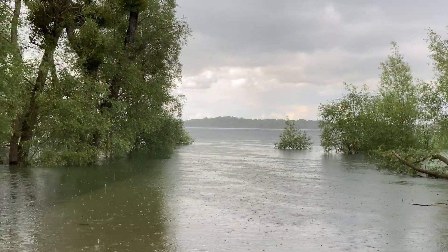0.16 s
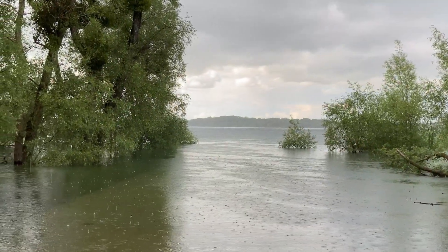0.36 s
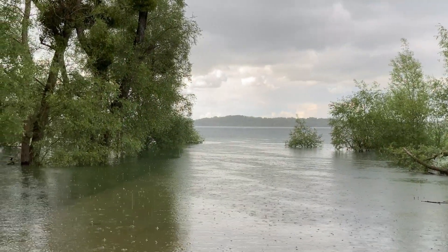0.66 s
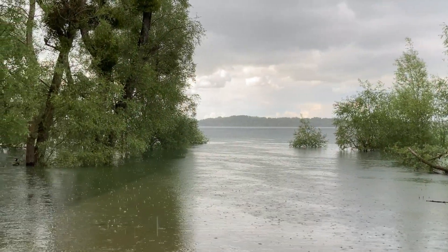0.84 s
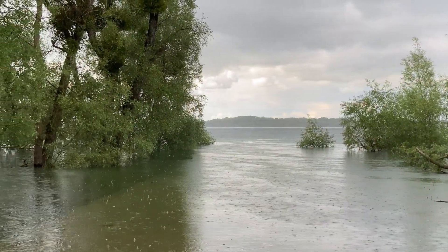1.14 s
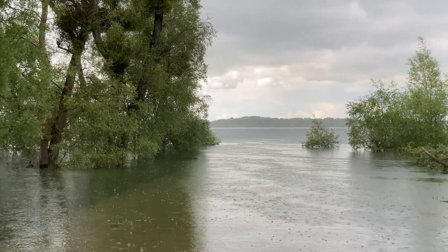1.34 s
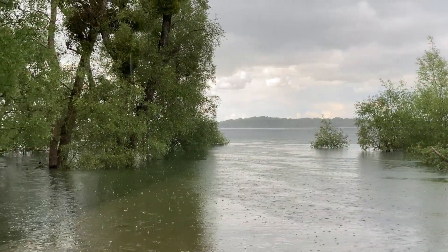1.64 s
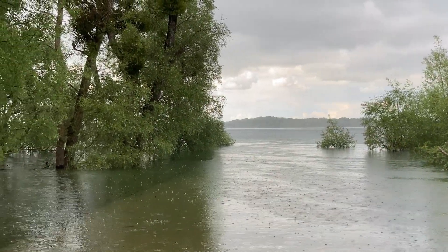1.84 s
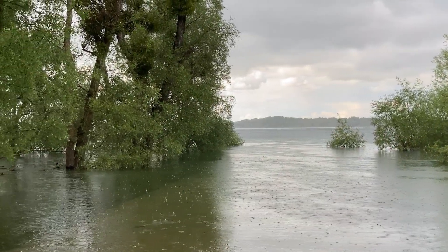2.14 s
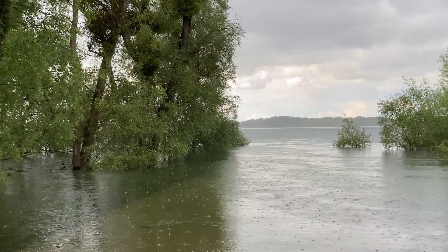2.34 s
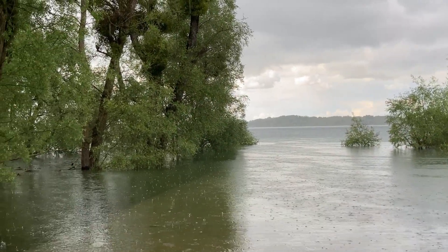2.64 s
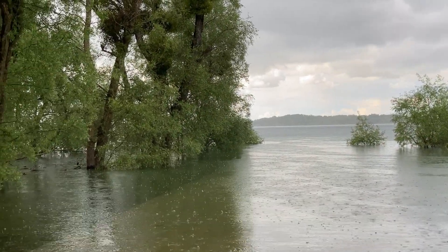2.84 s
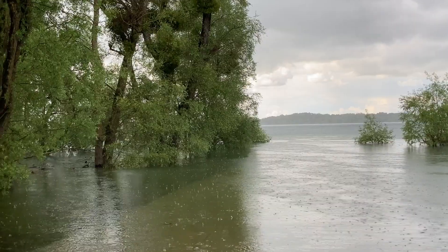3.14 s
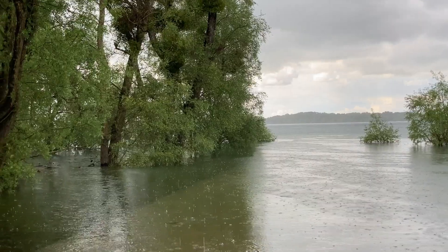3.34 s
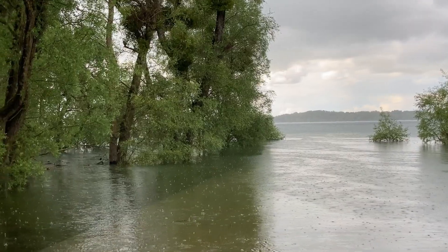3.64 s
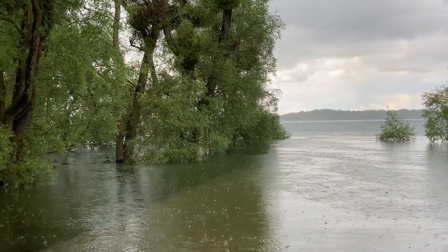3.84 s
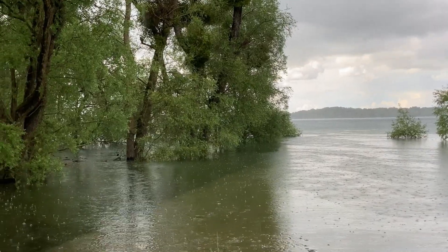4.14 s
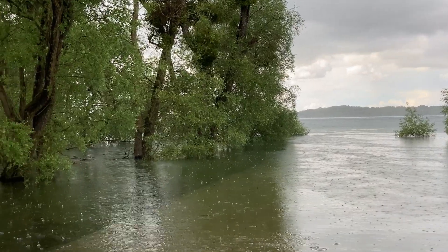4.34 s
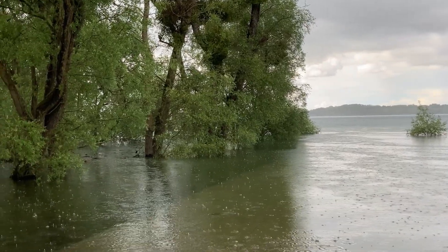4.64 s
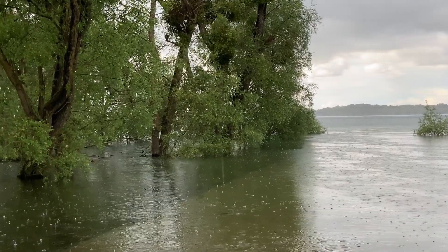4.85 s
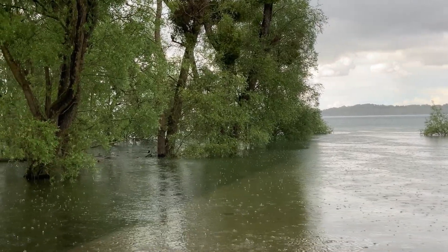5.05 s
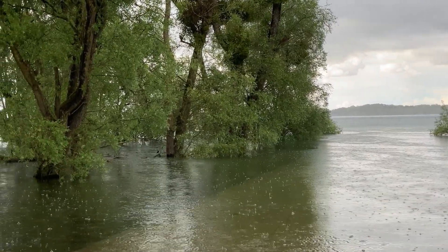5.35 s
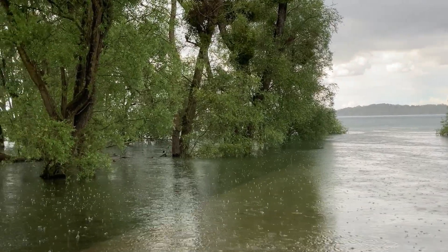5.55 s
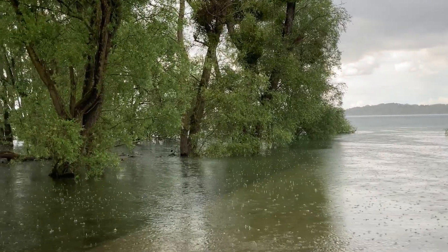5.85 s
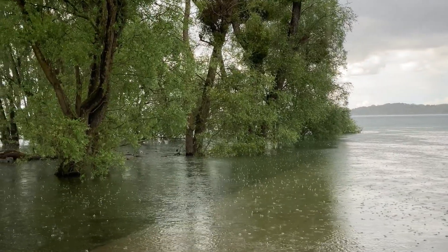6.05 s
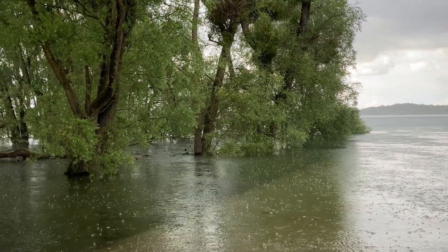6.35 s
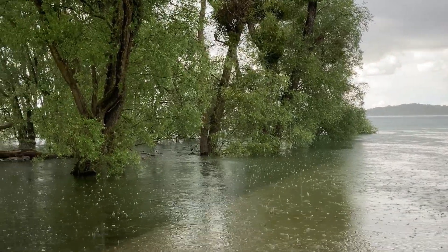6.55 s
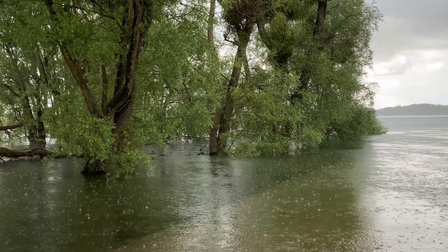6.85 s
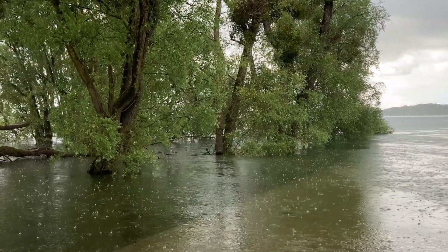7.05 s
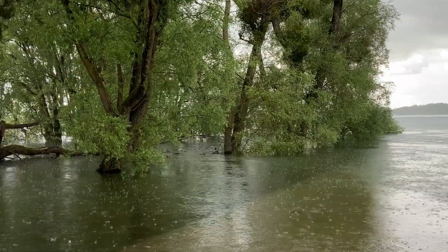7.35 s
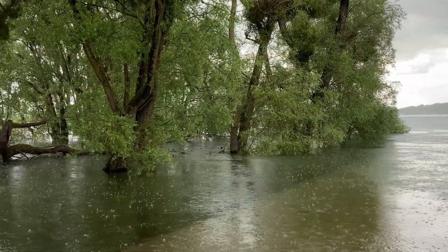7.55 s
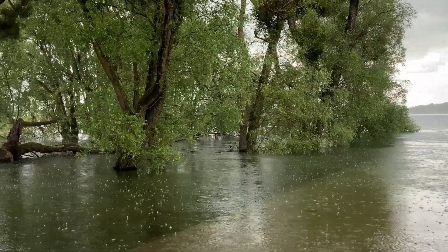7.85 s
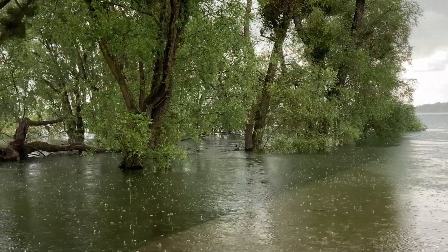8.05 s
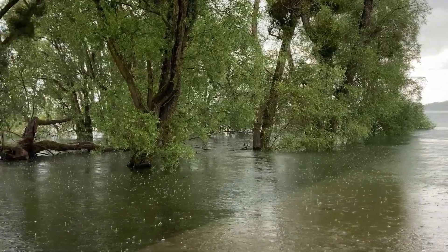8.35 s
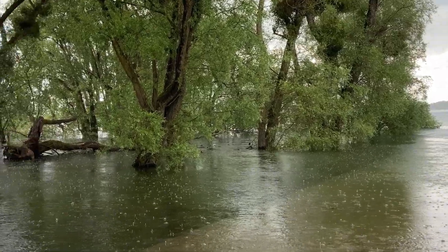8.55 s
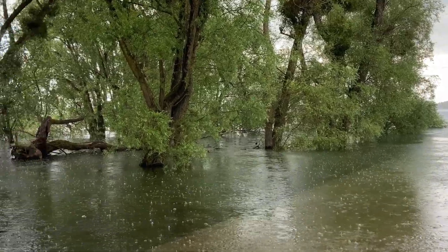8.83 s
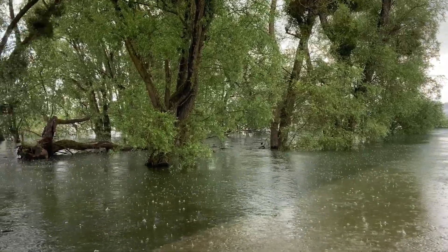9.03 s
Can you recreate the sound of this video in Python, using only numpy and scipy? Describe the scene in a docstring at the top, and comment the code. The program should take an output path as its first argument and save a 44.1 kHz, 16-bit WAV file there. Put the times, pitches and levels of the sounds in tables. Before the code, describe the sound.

Close outdoor sound from beneath an umbrella on a flooded, tree-lined shore. Dry, irregular pats and plips of rain on stretched fabric stand out over an even, distant wash of rain on water. Heavy drops cluster early, thin out, then gather again towards the end. Occasional crisp ticks land very near the microphone. From the middle on, a tiny high-pitched, hoarse bird call repeats quietly, slightly echoed by the woods.

```python
"""Heavy rain on a flooded lake shore, with the microphone under the taut canopy of an umbrella.
From the start, noise hisses for rain on the lake and leaves, and low noise for the trembling canopy;
small drops patter overhead, then lighter drips and big drops pat: falling chirps with scattered echoes.
Fine spray ticks at random moments, close to the microphone.
About halfway in, a small bird in the trees begins a thin falling whistle: a quavering tone with an echo."""
import sys
import numpy as np
from scipy import signal
from scipy.fft import rfft, irfft, next_fast_len
from scipy.io import wavfile
from scipy.ndimage import map_coordinates

SR = 44100
rng = np.random.default_rng(int(sys.argv[2]) if len(sys.argv) > 2 else 0)


def unload_wav(signal):
    """Save mono or channel-first audio to the path in sys.argv[1] as 16-bit WAV at rate SR, clipped to [-1, 1]."""
    wavfile.write(
        sys.argv[1],
        SR,
        np.round(np.clip(np.atleast_2d(signal).T, -1, 1) * 32767).astype(np.int16),
    )


N = 405279


def amp(db):
    """Decibels to gain."""
    return 10 ** (np.asarray(db) / 20)


def unit(x):
    """Scaled to rms 1."""
    return x / np.sqrt(np.mean(x ** 2) + 1e-20)


def along(points, hz):
    """(pitch_hz, value) points read on a log pitch axis."""
    f, v = np.transpose(points)
    return np.interp(np.log(hz + 1), np.log(f + 1), v)


def below(hz, edge_hz, order):
    """Gain of a smooth low-pass; one minus it is the matching high-pass."""
    return 1 / (1 + (hz / edge_hz) ** order)


def wobble(rate):
    """A smooth random curve, rate knots a second."""
    knots = rng.standard_normal(int(N * rate / SR) + 4)
    return map_coordinates(knots, [np.arange(N) * rate / SR])


def filtered(x, response):
    """x times a complex response of frequency."""
    m = next_fast_len(N + SR // 2)
    return irfft(rfft(x, m) * response(np.fft.rfftfreq(m, 1 / SR)), m)[..., :N]


def coloured(x, spectrum):
    """x shaped by a spectrum, at rms 1."""
    return unit(filtered(x, lambda hz: amp(along(spectrum, hz))))


# Spectrum of rain on the lake and the leaves, beyond the umbrella:
# pitch_hz [Hz], level_db [relative dB per Hz]
LAKE_SPECTRUM = [(30, -10), (200, 6), (500, -1), (1500, 5.5), (3000, 6), (5000, 0.5), (7000, -2.5),
                 (10500, -2), (13000, -5), (16000, -10.5)]


def lake(wash_db=-45.0, splash_db=-50.0, splashes_per_s=450):
    """Countless far drops merge into a wash; nearer splashes prickle through it."""
    wash = coloured(rng.standard_normal((2, N)), LAKE_SPECTRUM)
    hits = (rng.random((2, N)) < splashes_per_s / SR) * rng.standard_normal((2, N))
    splashes = coloured(hits, LAKE_SPECTRUM)
    drift_db = .4 * wobble(1.5)
    return (amp(wash_db) * wash + amp(splash_db) * splashes) * amp(drift_db)


# How hard the fine rain beats on the canopy overhead:
# time_s [s], level_db [dB, before the settings of each layer]
RAIN_BEATING = [(0.0, -37.5), (0.7, -35.5), (1.8, -40), (2.0, -37), (2.6, -41), (3.2, -36.5), (3.5, -40.5),
                (4.0, -35.5), (4.5, -38.5), (4.7, -35), (6.7, -40), (6.9, -36.4), (7.6, -33.5),
                (9.18, -32.0)]


def beating(s):
    """Level of the rain on the canopy in dB at the times s."""
    return np.interp(s, *np.transpose(RAIN_BEATING))


# Spectrum of the whole canopy quivering above the microphone:
# pitch_hz [Hz], level_db [relative dB per Hz]
QUIVER_SPECTRUM = [(20, -31), (55, 8.5), (125, 10.5), (500, -14), (2000, -73)]


def quiver(level_db=-51, follow=0.48):
    """The steady beating keeps the whole canopy trembling."""
    beating_db = beating(np.arange(N) / SR)
    swell_db = follow * (beating_db - beating_db.mean()) + 2 * wobble(6)
    return amp(level_db + swell_db) * coloured(rng.standard_normal(N), QUIVER_SPECTRUM)


def placed(times, sounds):
    """Stereo sounds (events, 2, samples) summed at their times."""
    at = np.round(times * SR).astype(int)[:, None] + np.arange(sounds.shape[-1])
    inside = (at >= 0) & (at < N)
    return np.array([np.bincount(at[inside], sounds[:, c][inside], N) for c in range(2)])


# What the struck canopy radiates:
# pitch_hz [Hz], level_db [relative dB per Hz]
CANOPY_SPECTRUM = [(25, -42), (55, -9.5), (130, -3), (230, 0.5), (600, 0.5), (1000, -4), (1500, -4.5),
                   (2050, -8), (2600, -13.5), (3600, -12.5), (5000, -16), (6500, -22.5), (10000, -23),
                   (16000, -35)]


def strikes(rows, scatter_db, colour_db, spread_s, pan_db, sheen_db):
    """Drops strike the canopy: its waves carry treble faster than bass, so each pat falls in pitch."""
    s, pat_db, thump_db, tick_db, crisp_db = np.transpose(rows)
    size, lead_s, span_s = 1536, .004, .01  # samples per pat, time before it, time its level is taken over
    lag_s, knee_hz = 0.02222, 102.7  # typical lag of the deepest bass; above the knee the lag shrinks
    rib_s, rib_share = .0007, .4  # typical delay and strength of the echo from the nearest rib
    ring_db = -35.5  # after-ring of the cloth

    count = len(s)
    t, hz = np.arange(size) / SR - lead_s, np.fft.rfftfreq(size, 1 / SR)
    reach, side, lean, rib = rng.uniform(-1.03, 1, (count, 4)).T[:, :, None, None]
    ports = np.array([[1], [-1]])  # left and right of the microphone

    # the farther from the microphone a drop lands, the longer its bass lags
    delay_s = lag_s * (1 + 0.24 * reach) / (1 + (hz / knee_hz) ** 1.526)
    chirp = np.exp(-2j * np.pi * np.cumsum(delay_s, axis=-1) * hz[1])
    direct = np.exp(1j * np.pi * hz * (ports * spread_s * side - 2 * lead_s))
    # the nearest rib throws the wave back, which gives each pat a hollow note of its own
    direct = direct * (1 + rib_share * np.exp(-2j * np.pi * hz * rib_s * 2 ** rib))

    # a faint swell leads into each pat; ribs and hem scatter it, then ring faintly
    ahead = amp(scatter_db + 60 * np.minimum(t, 0) / .012)
    behind = amp(scatter_db - 60 * np.abs(t) / .017) + amp(ring_db - 60 * t / .075)
    echoes = rfft(rng.standard_normal((count, 2, size)) * np.where(t < 0, ahead, behind))
    # long waves reach both ports alike
    alike = below(hz, 480, order=3)
    echoes = .5 * np.sqrt(alike) * echoes[:, :1] + np.sqrt(1 - alike) * echoes

    # every spot of the cloth has its own colour: random bumps along a warped pitch axis
    pitch = np.log1p(hz / 900)
    bumps = signal.resample(rng.standard_normal((count, 20)), size, axis=1)
    spot = bumps[:, (pitch / pitch[-1] * (size - 1)).astype(int)]
    colour = amp(along(CANOPY_SPECTRUM, hz) + colour_db * spot[:, None])
    pan = amp(pan_db * lean * ports * np.sqrt(1 - alike))
    wave = colour * chirp * (direct + echoes) * pan
    # the nearer to the microphone a drop lands, the more topmost treble it keeps
    wave = wave * amp((sheen_db - 6 * reach) * (1 - below(hz, 6500, order=6)))

    # size and speed of the drop share its energy among thump, pat, tick and crisp top
    low, mid, high = (below(hz, edge_hz, order=4) for edge_hz in (330, 1200, 2900))
    shares = ((low, thump_db), (mid - low, 0), (high - mid, tick_db), (1 - high, crisp_db))
    power = np.sum(np.abs(wave) ** 2, axis=1)
    gain = 0
    for band, db in shares:
        rms = np.sqrt(power @ band ** 2 / (size * span_s * SR))
        gain = gain + np.outer(amp(pat_db + db) / rms, band)
    return placed(s - lead_s, irfft(wave * gain[:, None]))


def shower(count, gather):
    """Random landing times in flurries; with gather above 0 they crowd where the rain beats harder."""
    s = np.arange(N) / SR
    flurry_db = 2.5 * wobble(30)
    fallen = np.cumsum(amp(gather * beating(s) + flurry_db))
    shares = (np.arange(count) + rng.random(count)) / count
    return np.interp(shares, fallen / fallen[-1], s)


def small_drops(top_db=1.0, range_db=16, thump_db=-5.0, tick_db=0.0, crisp_db=-5, count=720):
    """Ordinary raindrops patter overhead in little flurries, at widely varied levels."""
    s = shower(count, gather=.3)
    level_db = beating(s) + top_db - range_db * np.sqrt(rng.random(count))
    # each big drop throws up a droplet that lands just after it
    big_s, big_db = np.transpose(BIG_DROPS)[:2]
    s = np.r_[s, big_s + rng.uniform(.002, .012, len(big_s))]
    level_db = np.r_[level_db, big_db - rng.uniform(12, 20, len(big_s))]
    tone_db = np.array([thump_db, tick_db, crisp_db]) + 3.5 * rng.standard_normal((len(s), 3))
    rows = np.c_[s, level_db, tone_db]
    return strikes(rows, scatter_db=-25, colour_db=3, spread_s=0.00041, pan_db=3.0, sheen_db=-3.5)


# Lighter drips from the leaves onto the canopy:
# start_s [s], level_db [dB of the pat over 10 ms, before gain_db], brightness_db [dB]
LEAF_DRIPS = [(0.033, -30.5, -2.5), (0.054, -34.5, 1), (0.292, -33.5, -2), (0.358, -32.5, 2),
              (0.398, -29.5, -8), (0.42, -36, 4), (0.475, -33.5, -3), (0.885, -30, -6), (0.898, -32.0, 1),
              (1.214, -39, 5), (1.374, -34.5, 3), (1.414, -30.5, 0), (1.546, -33, -1), (1.69, -33, 4.5),
              (1.749, -38.5, -2), (1.933, -36.5, -2), (1.981, -35, -6), (1.996, -30.5, -6), (2.013, -38, 4),
              (2.073, -33, -1), (2.276, -32, -5.5), (2.37, -34.5, 0.5), (2.377, -38, -4.5),
              (2.411, -38.5, 6), (2.426, -34, 0.5), (2.451, -35.5, 0), (2.479, -33.5, 1.5),
              (2.607, -39.5, -4), (2.695, -39.5, 3), (2.76, -36, 4), (2.771, -36, -3), (2.92, -38.0, 6),
              (2.995, -34, -1), (3.095, -34.5, -3), (3.368, -42, 9.5), (3.598, -32.0, -1), (3.708, -38, -1),
              (3.714, -36.5, -2), (3.748, -37.5, 3), (3.914, -32, -3.5), (4.093, -40, 10.5),
              (4.11, -37.5, 7), (4.126, -35.0, 2), (4.136, -34, 0), (4.156, -37, 2), (4.344, -35.5, 1.5),
              (4.493, -39, -12), (4.645, -30.0, -8), (4.66, -30.5, -7.5), (4.804, -32.5, -5),
              (4.865, -35.5, 0), (4.976, -33.5, -1), (5.078, -37, -6), (5.154, -32.5, 2), (5.16, -29.5, -1),
              (5.332, -34.5, -4), (5.37, -29.0, -9), (5.439, -33.5, 4.5), (5.458, -32, -3),
              (5.583, -36.5, 5.5), (5.605, -34.5, 2.5), (5.739, -33.5, 2), (5.782, -32.5, -3),
              (5.874, -38.5, 4), (5.886, -33.5, -4), (6.106, -37.5, -4), (6.177, -35, 1), (6.185, -37, 5.5),
              (6.306, -35, -3), (6.452, -37.5, 3), (6.474, -37, 4), (6.496, -34, -2), (6.79, -33.5, -2.5),
              (6.897, -34.0, 1), (6.909, -32.5, -1.5), (6.963, -37, -0.5), (7.18, -34.5, 4),
              (7.244, -40, 10), (7.268, -31, -3), (7.286, -35.0, 3), (7.298, -32, -6), (7.332, -31.5, 1),
              (7.447, -37, 1), (7.504, -36, -3), (7.532, -33.5, 0), (7.56, -32, 4.5), (7.567, -28.5, -2),
              (7.574, -32.5, 1), (7.598, -31.5, -5), (7.704, -36, 5), (7.747, -32, 2), (7.781, -33.5, -5),
              (7.833, -31.5, 1), (7.854, -38.5, 4.5), (7.927, -34, 2.5), (7.95, -37, 7.5),
              (7.988, -33.5, 0.5), (8.003, -33.5, 0), (8.035, -34.0, -4), (8.073, -30, 0.5),
              (8.173, -33, -3), (8.272, -33.5, -2), (8.296, -30.5, -2), (8.394, -34.0, 1),
              (8.402, -30.5, 0), (8.428, -34.5, 1), (8.48, -39, 6), (8.487, -35.5, 8), (8.686, -32, 0),
              (8.757, -31, -1), (8.772, -33.0, 2), (8.793, -33.5, 2), (8.825, -33.5, 0), (8.899, -32.0, 2),
              (8.913, -32.0, 2.5), (9.016, -32.5, -1), (9.071, -36.5, 3), (9.154, -31, -2)]


def medium_drops(gain_db=-0.4, thump_db=-4.0, tick_db=-3.5, crisp_db=-6.5):
    """Lighter drips plip out of the patter; the faster one lands, the more tick and the less thump."""
    s, level_db, bright_db = np.transpose(LEAF_DRIPS)
    tone_db = np.c_[thump_db - bright_db / 2, tick_db + bright_db, crisp_db + bright_db]
    rows = np.c_[s, level_db + gain_db, tone_db]
    return strikes(rows, scatter_db=-27, colour_db=2.5, spread_s=0.0003, pan_db=3.0, sheen_db=-2.5)


# The heaviest drops on the canopy:
# start_s [s], level_db [dB of the pat over 10 ms, before gain_db],
# then against the pat: thump_db [dB], tick_db [dB], crisp_db [dB]
BIG_DROPS = [(0.1256, -36, 5, 0, -2), (0.4889, -27.5, 2.5, -4.5, -6), (0.519, -29.0, -4.0, 1, -5),
             (0.6251, -27.0, 1, -23, -5.5), (0.6846, -20.5, -1.5, -6, -12),
             (0.736, -24.5, -3.0, -2.5, -10.5), (0.7475, -26.5, -3, -14, -8), (0.8184, -26.5, -1, -8, -11),
             (0.8329, -26.0, 1, -4.0, -1.5), (0.9345, -26.5, -2.5, -9, -0.5), (0.978, -29, -7, -5, -8),
             (1.0881, -26, 2.0, -7.5, -7.0), (1.2518, -32.5, -5, 7, 1), (1.3923, -28, -0.5, -8, -5),
             (1.4667, -27, -4.0, -15, -0.5), (2.0282, -27, -2.5, -3.5, -4.5), (2.1682, -28, 2.5, 3, -9),
             (2.5418, -26, -3, 0, -14), (3.0361, -29.0, -5.0, -3.0, -5.5), (3.2175, -24.5, -1.5, -8, -7.5),
             (3.254, -31, 2, -20, -2.5), (4.416, -27, -18, -2.0, -5.5), (4.4307, -28, -11, 0, -9.0),
             (4.7028, -37.5, 6, 12.5, -1), (4.786, -26.5, -6, 1.5, -5), (4.9694, -25.0, 2.5, -4.5, -5.5),
             (5.212, -24, 0, -5, -9), (5.3475, -32, 2, -9, -8.0), (5.4854, -29.0, 1.5, -5.0, -2.5),
             (5.7017, -24, -0.5, -9.5, -12.5), (6.0631, -30.5, -4, -13, 0.5),
             (6.0714, -32.5, -2.5, -6.0, -10), (6.3612, -23.5, -5, -4.5, -4.5),
             (6.8228, -25.5, -9, -16, -6.5), (6.8836, -30.5, 1.5, -17, -6.5), (7.1494, -32.5, 3, 1, -4),
             (7.3687, -26, 5.5, 6, -3.5), (7.392, -27.5, -3.5, -21, -6), (7.6395, -31, 2.0, 0.0, 0),
             (7.7621, -21.5, -4.5, -20, -14), (8.1626, -27.5, -1, -12, -11), (8.1894, -22.5, -2, -8, -6),
             (8.3861, -34, -5, 1, -8), (8.4409, -28.5, 0, -8, -11.0), (8.4711, -26.0, -9, -3, -6),
             (8.6651, -29.5, -1.5, -7, -10), (8.7494, -30.5, -3.0, -1.0, -7), (8.807, -30, -10, -7, -6),
             (8.8689, -30.5, 2, -6, -7), (8.981, -27.5, -7, -4.5, -10.5), (9.0545, -28.0, -1, -3.5, -8),
             (9.1243, -29, 0.5, -2.0, -2)]


def big_drops(gain_db=-0.31):
    """Fat drops, many shed by the trees, land close to the microphone as strong falling pats."""
    pats = strikes(BIG_DROPS, scatter_db=-25, colour_db=2.1, spread_s=.00017, pan_db=1.8, sheen_db=-4.0)
    return amp(gain_db) * pats


def spray(level_db=-53, spread_db=3, count=26):
    """Now and then a fine droplet ticks right beside the microphone: treble with little weight."""
    s = shower(count, gather=0)
    pat_db = level_db + spread_db * rng.standard_normal(count)
    thump_db, tick_db, crisp_db = -10, 0, 9
    rows = np.c_[s, pat_db, np.tile([thump_db, tick_db, crisp_db], (count, 1))]
    return strikes(rows, scatter_db=-26, colour_db=2, spread_s=.0002, pan_db=3, sheen_db=12)


# Whistles of the bird in the trees:
# start_s [s], level_db [dB of the tone's peak, before the echo]
BIRD_WHISTLES = [(4.42, -53), (5.19, -47.5), (6.23, -46.5), (7.13, -45.5), (8.08, -45.5), (9.06, -46)]
# Echo of the wood around the bird:
# pitch_hz [Hz], t60_s [s to fade by 60 dB]
WOOD_ECHO = [(500, 0.067), (9000, 0.38)]


def bird():
    """A thin, hoarse, falling tone, smeared by the trees: convolved with noise that fades by pitch."""
    length_s, start_hz, fall_hz = .22, 8800, 460
    quaver_hz, quaver_rate = 250, 600  # depth of the hoarseness, and its knots per second
    u = np.linspace(0, 1, int(length_s * SR))
    swell = np.sqrt(np.abs(np.sin(np.pi * u)))
    song = np.zeros(N + SR)
    quavers = quaver_hz * wobble(quaver_rate)[:len(BIRD_WHISTLES) * len(u)].reshape(-1, len(u))
    for (s, db), quaver in zip(BIRD_WHISTLES, quavers):
        # each fall is a little different and levels out
        pitch_hz = start_hz - fall_hz * rng.uniform(.8, 1.4) * u * (2 - u) + quaver
        tone = np.sin(2 * np.pi * np.cumsum(pitch_hz) / SR)
        song[round(s * SR):][:len(u)] += amp(db) * swell * tone
    hz, t, z = signal.stft(rng.standard_normal((2, SR // 2)), SR, nperseg=256)
    fade = amp(-60 * t / along(WOOD_ECHO, hz)[:, None])
    tail = signal.istft(z * fade, SR, nperseg=256)[1]
    return signal.fftconvolve(song[None, :N], tail / np.linalg.norm(tail[0]), axes=1)[:, :N]


def scene():
    """The umbrella, a little to the right overhead, in front of the lake and the bird."""
    # pitch_hz [Hz], left minus right [dB]
    lean = [(60, -2.5), (400, -3.0), (1900, -1.5), (2700, 3.5), (3800, -0.5)]
    canopy = quiver() + small_drops() + medium_drops() + big_drops() + spray()
    halves = np.array([[.5], [-.5]])
    umbrella = filtered(canopy, lambda hz: amp(along(lean, hz) * halves))
    return lake() + umbrella + bird()


def record(dry):
    """The left high treble is mostly the right's, inverted and slightly late; then the band limit."""
    lag_s, split_hz, top_hz = .00022, 6700, 16000

    def bass(hz):
        return np.sqrt(below(hz, split_hz, order=20))

    def treble(hz):
        return np.sqrt(1 - below(hz, split_hz, order=20))

    own = filtered(dry[0], bass)
    shared = filtered(dry[1], lambda hz: -treble(hz) * np.exp(-2j * np.pi * hz * lag_s))
    # some of the left's own treble stays, turned by a quarter cycle
    apart = filtered(dry[0], lambda hz: treble(hz) * 1j)
    left = own + .95 * shared + .31 * apart
    return filtered(np.array([left, dry[1]]), lambda hz: hz < top_hz)


dry = scene()
out = record(dry)
unload_wav(out)
```